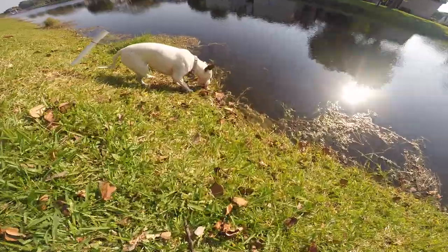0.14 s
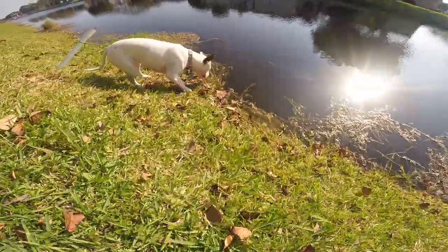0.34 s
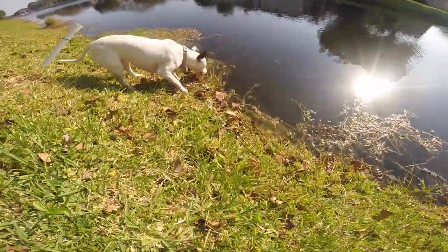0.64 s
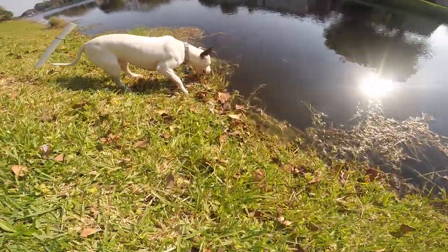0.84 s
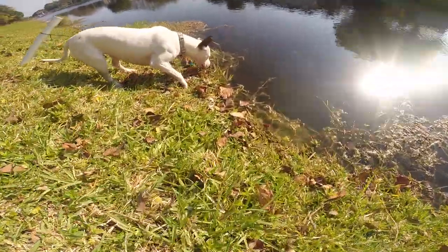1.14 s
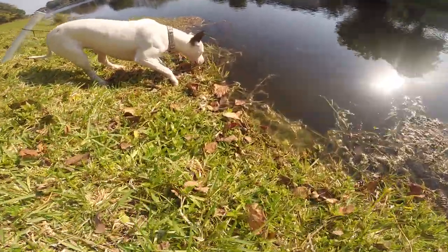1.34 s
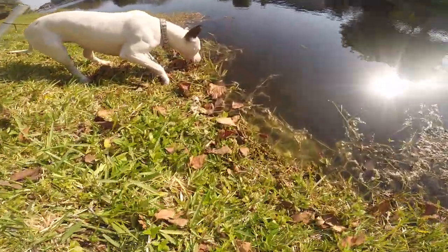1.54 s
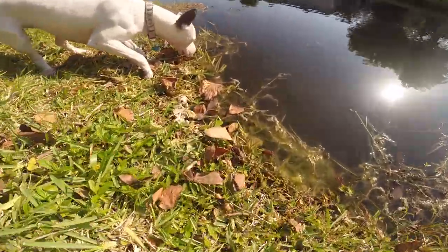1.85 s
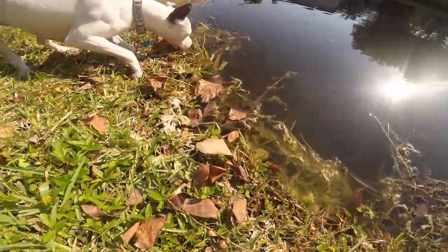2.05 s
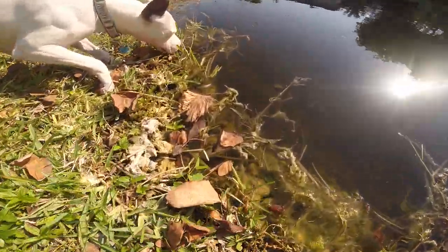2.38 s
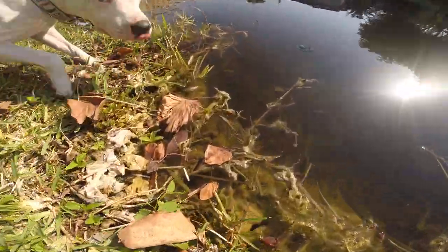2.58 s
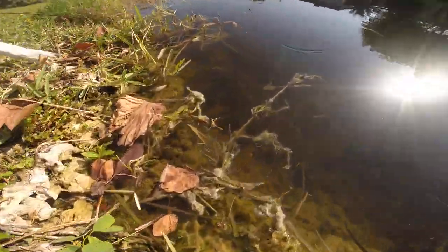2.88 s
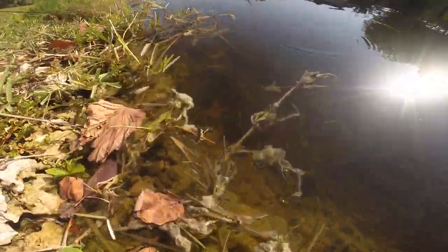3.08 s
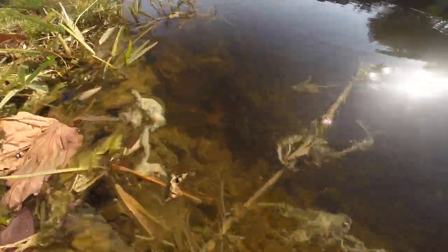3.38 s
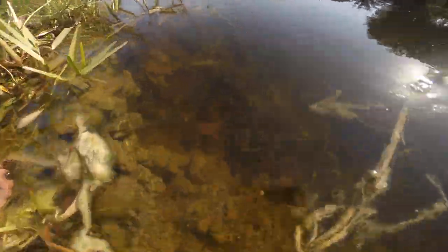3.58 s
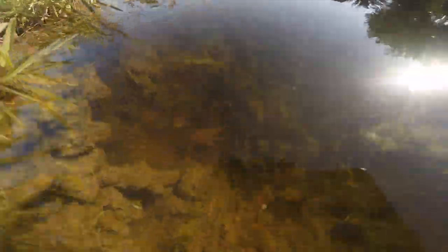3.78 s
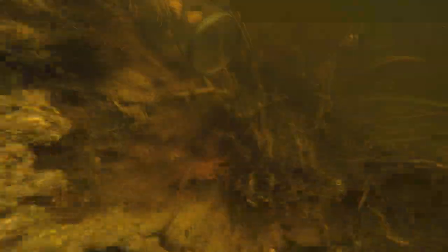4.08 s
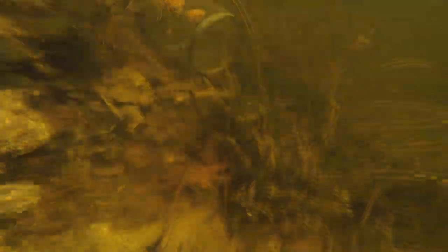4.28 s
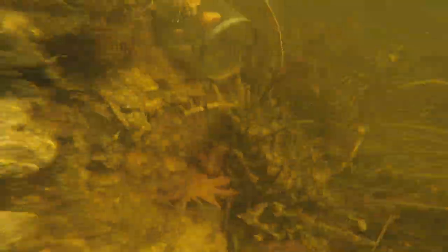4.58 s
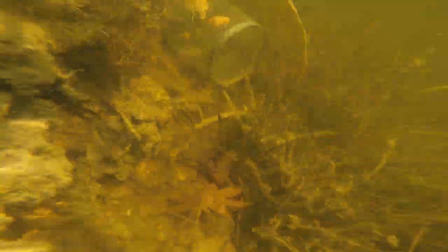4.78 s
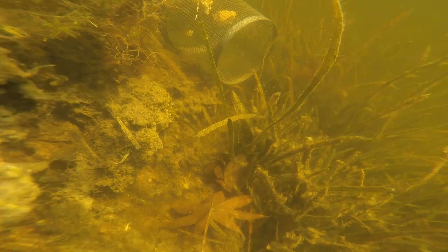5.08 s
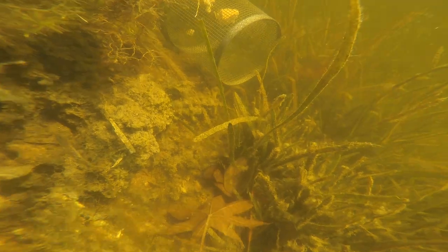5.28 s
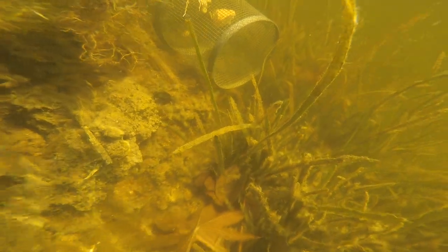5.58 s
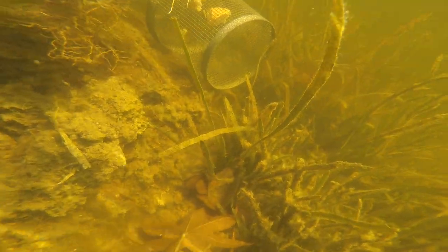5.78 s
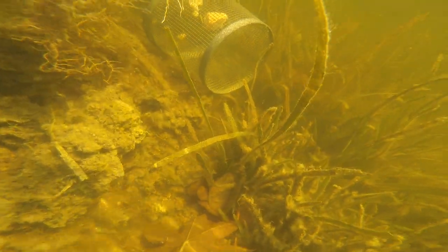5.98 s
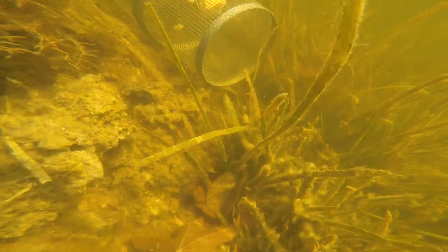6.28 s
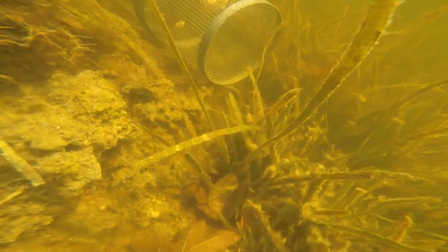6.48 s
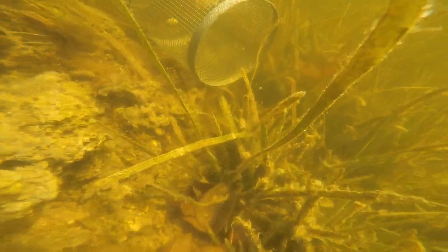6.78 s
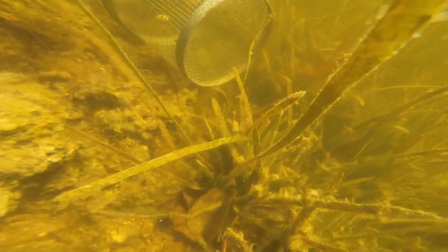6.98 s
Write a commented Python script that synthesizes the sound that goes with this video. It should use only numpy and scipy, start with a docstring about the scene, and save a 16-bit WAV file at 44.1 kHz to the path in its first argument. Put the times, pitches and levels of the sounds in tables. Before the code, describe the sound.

Boomy knocks and plastic rattles of a sealed camera housing over grass, faint collar tag jingles, then a sharp watery plunge and muffled underwater thuds.

```python
"""A camera in a sealed housing is carried over a grassy bank, past a dog, and dipped into a pond.
From the start, jolts boom in the mount and rattle the plastic shell, the grip rubs and low trembling goes on.
Grass crackles along the bank, then the dog's collar tags tinkle as a few fast-dying high tones.
Water snaps, gulps and fizzes as it closes over the shell: short rings, gliding tones and filtered tiny clicks.
Below the surface there are dull thuds and, near the end, a stronger low rumble; hiss and a whine run throughout."""
import sys
import numpy as np
from scipy import signal
from scipy.fft import rfft, irfft
from scipy.io import wavfile
from scipy.ndimage import uniform_filter1d

SR = 44100
rng = np.random.default_rng(int(sys.argv[2]) if len(sys.argv) > 2 else 0)


def put_to_file(sound):
    """Save the sound as 16-bit audio at rate SR, in the file named by the first command-line argument."""
    columns = np.atleast_2d(sound).T  # one column per channel
    safe = np.clip(columns, -1, 1)
    whole_steps = np.round(safe * 32767)
    wavfile.write(sys.argv[1], SR, whole_steps.astype(np.int16))


N = 314874
TIME = np.arange(N) / SR  # s
SUBMERGED_S = 4.0  # sounds that start after this use the shell and mount loaded by water


def amp(db):
    """Turns decibels into a gain."""
    return 10 ** (np.asarray(db) / 20)


def unit_rms(x):
    """Scales a sound to an rms (average strength) of 1."""
    return x / np.sqrt(np.mean(x ** 2) + 1e-20)


def unit_peak(x):
    """Scales a sound to a peak of 1."""
    return x / (abs(x).max() + 1e-20)


def add(mix, start, sound):
    """Mixes a sound in at a start time in seconds, cut off where the mix ends."""
    part = mix[round(start * SR):][:len(sound)]
    part += sound[:len(part)]


def fade(t, t60):
    """Dies away smoothly, 60 dB down after t60 seconds."""
    return np.exp(-np.log(1000) * t / t60)


def swell(start, end, attack, release):
    """Loudness that rises from start over attack, holds until end and falls 60 dB in release (all s)."""
    rise = np.clip((TIME - start) / attack, 0, 1)
    return rise * fade(np.maximum(TIME - end, 0), release)


def flutter(depth_db, size):
    """A random gain that wanders over about size samples."""
    smooth = uniform_filter1d(rng.standard_normal(N), size)
    smooth = uniform_filter1d(smooth, size)
    return amp(depth_db * unit_rms(smooth))


def grains(per_s, spread_db):
    """Random tiny clicks of uneven size, scaled to rms 1."""
    size = amp(spread_db * np.minimum(rng.exponential(1, N), 4))
    happens = rng.random(N) < per_s / SR
    return unit_rms(size * rng.choice([-1, 1], N) * happens)


def colour(x, points):
    """Filters a sound to a tone colour given as (f/Hz, level/dB) points, then scales it to rms 1."""
    hz, db = np.transpose(points)
    f = np.fft.rfftfreq(len(x), 1 / SR)
    gain = amp(np.interp(np.log(f + 1), np.log(hz + 1), db))
    return unit_rms(irfft(rfft(x) * gain, len(x)))


def resonate(x, hz, width):
    """A resonance of about gain 1: shifts its pitch down to zero, smooths, and shifts back up."""
    turn = np.exp(2j * np.pi * hz * np.arange(len(x)) / SR)
    r = np.exp(-np.pi * width / SR)
    smoothed = signal.lfilter([1 - r], [1, -r], x / turn + 1e-18)
    return 2 * (turn * smoothed).real


def muffle(x, hz, order=4):
    """Takes away the sound above a frequency (low-pass)."""
    return signal.sosfilt(signal.butter(order, hz, fs=SR, output="sos"), x)


def jolts():
    """A soft push sets the mount booming, while the shell clacks and chatters briefly in its seat."""
    # jolts of the housing: [t/s, boom peak level/dB, rattle peak level/dB, rattle brightness f/Hz]
    jolt_list = [(.003, -21.5, -44, 1500), (.104, -13.5, -49, 4500), (0.138, -23.5, -54, 3500),
                 (.317, -32.5, -37.5, 2520), (.3605, -19, -29.5, 4800), (.392, -22, -35.5, 2500),
                 (.857, -20.5, -30.5, 2800), (.884, -25, -26.5, 3750), (.904, -20, -24.5, 3970),
                 (1.025, -32.5, -36.5, 2460), (1.167, -25, -48, 1000), (1.226, -25, -31, 4260),
                 (1.416, -16, -29, 2180), (2.698, -26, -48, 1500), (2.74, -16.5, -37, 1590),
                 (2.895, -13.5, -29, 3400), (2.951, -19, -42, 890), (3.056, -8.5, -34, 694),
                 (3.473, -10, -31, 3800), (4.604, -23, -31.5, 1500), (5.664, -24.5, -40, 800),
                 (5.757, -13, -25, 800), (5.802, -13, -56, 905), (5.987, -12.5, -28, 3100),
                 (6.048, -11.5, -21.5, 2520), (6.081, -7, -18, 2480)]
    # the mount's ways of vibrating in air: [f/Hz, relative level/dB, 60 dB decay t/s]
    mount_modes = [(63.35, -3.5, 0.38), (88.77, 5, 0.27), (125.7, 8, 0.032), (169.2, 1, 0.12),
                   (228, -3, 0.12), (319, -11, 0.11), (457.4, -19.5, 0.27), (630, -11, 0.085)]
    # a push lasts longer the more its boom outweighs its rattle
    push_s, push_doubles_db = 0.0003, 10.5
    water_load = .87  # clinging water lowers the mount's pitch by this factor
    t, out = TIME[:SR // 3], np.zeros(N)
    for start, boom_db, rattle_db, top_hz in jolt_list:
        load = 1 if start < SUBMERGED_S else water_load
        mount = np.zeros(len(t))
        for k, (hz, db, t60) in enumerate(mount_modes):
            # neighbouring modes start in opposite directions, so the boom swells and beats
            mount += (-1) ** k * amp(db) * np.sin(2 * np.pi * load * hz * t) * fade(t, t60)
        push = push_s * 2 ** ((boom_db - rattle_db) / push_doubles_db)
        force = t * np.exp(-t / max(push, 1e-4))
        boom = unit_peak(signal.fftconvolve(mount, force)[:len(t)])

        clack = amp(10.5) * (t == 0)  # the first contact drives all resonances alike
        chatter = rng.standard_normal(len(t)) * (fade(t, 0.022) + amp(-23.0) * fade(t, 0.29))
        rattle = unit_peak(shell(clack + chatter, start, top_hz))
        add(out, start, amp(boom_db) * boom + amp(rattle_db) * rattle)
    return out


def shell(x, start, top_hz):
    """Rings the plastic shell, in air or loaded by water; a low top_hz leaves only its low resonances."""
    # the shell's resonances in air: [f/Hz, width of each of two passes f/Hz, level/dB]
    in_air = [(363, 290, 3.5), (571, 75, 4), (644, 85, 0.5), (1187, 570, -2.5), (1493, 125, 1.5),
              (1748, 114, 0.5), (2010, 370, 2), (2565, 310, 0), (2710, 290, -1.5), (3476, 130, -2),
              (4700, 300, -3), (5480, 930, -9.5)]
    # the shell's resonances loaded by water: [f/Hz, width of each of two passes f/Hz, level/dB]
    in_water = [(221, 43, 9.5), (415, 73, 2.5), (634, 104, 6.5), (945, 134, 4.5), (1165, 370, 1.5),
                (1535, 170, 0), (2330, 200, -6), (2730, 250, -10.5), (3500, 490, -14.5), (4640, 210, -7.5),
                (5830, 280, -16.5)]
    ring = np.zeros(len(x))
    for hz, width, db in in_air if start < SUBMERGED_S else in_water:
        ring += amp(db) * resonate(resonate(x, hz, width), hz, width)
    return muffle(ring, top_hz, order=2)


def snaps():
    """Films of water burst at the seams: one sharp ring and a short spray."""
    # water snapping on the shell: [t/s, ring peak level/dB, ring f/Hz, spray level against the ring/dB]
    snap_list = [(4.021, -35.5, 5640, -1), (4.0654, -6.5, 3615, -3), (4.0673, -21, 2410, 3),
                 (4.073, -32.5, 3350, 13), (4.247, -27, 6970, -2), (4.248, -26, 2490, 1),
                 (4.674, -45.5, 4960, 14.5), (4.681, -38.5, 6500, 7), (4.845, -31, 11340, 5.5),
                 (4.899, -50, 12600, 16), (4.937, -35.5, 5730, -2), (5.015, -35, 4570, 4.5),
                 (6.125, -33.5, 2480, -7), (6.133, -48.5, 7200, -10)]
    # tone colour of the spray: [f/Hz, relative level per Hz/dB]
    spray_colour = [(300, 1.5), (1000, -0.5), (2000, 3.5), (4000, 2), (6500, -5.5), (8000, -14),
                    (11000, -18.5), (15000, -23)]
    snap_t60 = 0.0068  # s
    t, out = TIME[:SR // 10], np.zeros(N)
    for start, db, hz, spray_db in snap_list:
        ring = np.sin(2 * np.pi * hz * t) * fade(t, snap_t60) * (1 - np.exp(-t / 0.00013))
        spray = colour(rng.standard_normal(len(t)), spray_colour)
        spray *= fade(t, snap_t60) + amp(-35) * fade(t, 0.017)
        add(out, start, amp(db) * (unit_peak(ring) + amp(spray_db) * unit_peak(spray)))
    return out


def bubbles():
    """Water slaps the shell with a hollow tok and traps air, which rings with a gliding pitch."""
    # bubbles pinching off at the shell:
    # [t/s, ring level before its fades/dB, starting f/Hz, rise/octaves per s, slap level against the ring/dB]
    bubble_list = [(4.021, -34.5, 1740, 8, -16), (4.163, -23, 1766, 4, -14), (4.166, -28, 656, 4, -24),
                   (4.170, -27.5, 1414, 8, -6), (4.174, -32, 2640, 8, 1), (4.211, -38, 1630, 3, -6),
                   (4.318, -34.5, 1500, -2, 7.5), (4.808, -43, 460, 5, -10), (4.893, -33, 1280, 7, 4.5),
                   (4.909, -37, 1670, 41, -20), (4.986, -26.5, 1170, 4, 5), (4.999, -29, 1250, -2, 1),
                   (5.007, -26, 277, 6, 4.5), (5.065, -20.5, 1044, 2, -1.5), (5.176, -21, 1230, 2, -4),
                   (5.7655, -21, 630, 4.5, -15), (6.135, -17, 1010, 8, -2.5), (6.165, -37, 2270, -4, -25)]
    # ring time at this pitch; smaller, higher bubbles die sooner by this power
    ring_s, ring_hz, damping = 0.03, 1200, 0.34
    free_rise = 61  # octaves per s: a bubble racing up this fast has left the shell and rings twice as long
    t, out = TIME[:SR // 10], np.zeros(N)
    tok = unit_peak(resonate(t == 0, hz=640, width=550) * (1 - np.exp(-t / 0.001)))
    for start, db, hz, rise, slap_db in bubble_list:
        t60 = ring_s * (ring_hz / hz) ** damping * (1 + rise / free_rise)
        pitch = hz * 2 ** np.minimum(rise * t, 1)  # climbs one octave at most
        ring = np.sin(2 * np.pi * np.cumsum(pitch) / SR)
        ring *= fade(t, t60) * (1 - np.exp(-t / 0.00023))
        slosh = unit_rms(muffle(rng.standard_normal(len(t)), hz=1500, order=2)) * fade(t, 0.069)
        slap = tok + amp(-18) * slosh
        add(out, start, amp(db) * (ring + amp(slap_db) * slap))
    return out


def wash():
    """Fine fizz along the shell, bright as the water closes over it and dull below the surface."""
    # tone colour of the fizz: [f/Hz, relative level per Hz/dB]
    fizz_colour = [(200, 7), (800, -14), (1300, -5), (1900, -2.5), (2700, -0.5), (4000, -8.5), (6000, -4.5),
                   (8000, -17), (15000, -21)]
    touch_s, plunge_s, plunge_db = 4.016, 4.06, -41  # water climbs the shell, then closes over it
    fizz_db, fizz_t60, fizz_end_s = -51, 6, 5.05  # trapped air fizzes away
    fizz = colour(grains(per_s=2700, spread_db=3.0), fizz_colour)
    climb = fade(np.maximum(plunge_s - TIME, 0), 0.3)  # a fade run backwards
    plunge = climb * swell(touch_s, plunge_s, attack=.005, release=0.11)
    sunk = swell(plunge_s, plunge_s, attack=0.015, release=fizz_t60)
    sunk *= fade(np.maximum(TIME - fizz_end_s, 0), 0.42)
    dull = unit_rms(muffle(fizz, hz=2684, order=5)) + amp(-11) * fizz
    return amp(plunge_db) * plunge * fizz + amp(fizz_db) * sunk * dull


def rubs():
    """The grip sticks and slips in fast tiny jerks that ring the shell."""
    # the grip slipping on the shell: [start t/s, end t/s, rms level before the pressure shape/dB]
    rub_list = [(0.022, .05, -55), (.089, .172, -39), (0.361, .383, -44.5), (0.39, 0.502, -49.5),
                (.897, 0.973, -56), (1.223, 1.269, -51), (1.439, 1.495, -56), (5.666, 5.79, -58),
                (6, 6.291, -42.5), (6.379, 6.75, -51)]
    air_hz, water_hz = 4600, 2700  # brightness of a rub in air and under water
    ease_db = -3.5  # the grip eases off by this much over a stroke
    slips = grains(per_s=4000, spread_db=3.0) * flutter(depth_db=3.0, size=250)
    out = np.zeros(N)
    for start, end, db in rub_list:
        top_hz = air_hz if start < SUBMERGED_S else water_hz
        stroke = slips[int(start * SR):][:int((end - start) * SR)]
        pressure = signal.windows.tukey(len(stroke), .5) * amp(np.linspace(0, ease_db, len(stroke)))
        add(out, start, amp(db) * pressure * unit_rms(shell(stroke, start, top_hz)))
    return out


def tags():
    """Small metal tags clink and skitter on each other; mostly their high ring gets through."""
    # the dog's collar tags jingling: [t/s, ring peak level/dB, 60 dB settling of the bounces t/s]
    hit_list = [(2.651, -46.5, 0.037), (2.697, -33.5, 0.062), (2.822, -48, 0.11), (3.056, -43.5, 0.068),
                (3.1034, -41.5, 0.046), (3.274, -39.5, 0.016), (3.3012, -36.5, .08), (3.32, -43, .07),
                (3.334, -38, 0.032), (3.4507, -48.5, .03), (3.7863, -51.5, .02)]
    # the tags' ringing tones: [f/Hz, relative level/dB, 60 dB decay t/s]
    tag_modes = [(8600, -4, 0.053), (9200, -3, .03), (9920, 3, 0.044), (10050, 6, 0.05), (10060, 0, 0.07),
                 (10500, -17, .04), (11300, -12, 0.036), (14000, -5, .08)]
    # tone colour of the contact noise: [f/Hz, relative level per Hz/dB]
    clink_colour = [(1000, -16), (2500, 3), (5000, 8), (7200, 6.5), (11000, -28), (15000, -14)]
    clink_db = -5.5  # contact noise against the ring
    ticks_per_s, tick_db = 9, -55  # while the dog is near, its tags also touch faintly by chance
    t, out = TIME[:SR // 4], np.zeros(N)
    modes = np.array([amp(db) * np.sin(2 * np.pi * hz * t) * fade(t, t60) for hz, db, t60 in tag_modes])
    tick_times = np.arange(2.9, 3.9, 1 / ticks_per_s)  # s
    tick_times = tick_times + rng.random(len(tick_times)) / ticks_per_s
    ticks = [(start, tick_db, .03) for start in tick_times]
    for start, db, settle in list(hit_list) + ticks:
        skitter = rng.standard_normal(len(t)) * (rng.random(len(t)) < 450 / SR)  # about 450 bounces per s
        bounces = (t == 0) + skitter * fade(t, settle)
        spot = amp(6.3 * rng.standard_normal(len(modes)))  # each contact point favours other modes
        ring = signal.fftconvolve(bounces, spot @ modes)[:len(t)]
        clink = colour(rng.standard_normal(len(t)), clink_colour) * fade(t, 0.054)
        add(out, start, amp(db) * (unit_peak(ring) + amp(clink_db) * unit_peak(clink)))
    return out


def grass():
    """Blades brush and snap in clumps of fine crackle, heard through the shell."""
    # strides brushing through the grass: [start t/s, end t/s, level/dB]
    stride_list = [(0.592, 0.77, -61.5), (0.894, 0.983, -61), (1.477, 1.9, -61.5), (2.765, 2.98, -61)]
    # tone colour of the grass: [f/Hz, relative level per Hz/dB]
    grass_colour = [(800, -38), (1800, -2.5), (2900, 6.5), (4000, -6), (4900, 0), (5900, 3.5), (6600, -4),
                    (7600, -20), (11000, -12), (15000, -53)]
    attack, release = 0.029, 0.41  # s: the blades bend, then spring back
    crackle = grains(per_s=2500, spread_db=4.0) * flutter(depth_db=2.5, size=700)
    strides = sum(amp(db) * swell(start, end, attack, release) for start, end, db in stride_list)
    bank = amp(-70.5) * swell(0.54, 3.6, attack, release)  # faint rustle all the way down the bank
    return np.hypot(strides, bank) * colour(crackle, grass_colour)


def rumble():
    """Constant small pushes keep the mount's low modes stirring."""
    # tone colour of the trembling: [f/Hz, relative level per Hz/dB]
    tremble_colour = [(12, -9), (25, -0.5), (38, -11), (50, 0), (60, 4.5), (72, -7), (87, -0.5),
                      (105, -15.5), (140, -15), (190, -28.5), (220, -29), (300, -38.5), (600, -46),
                      (2000, -82)]
    stir = colour(rng.standard_normal(N), tremble_colour)
    steadied = stir / np.sqrt(uniform_filter1d(stir ** 2, size=6000) + 1e-6)  # evens out the level
    # walking dies down to a steady hand, then the housing rests against the pond bed
    hand, walk = amp(-46.5), amp(-33) * fade(TIME, 4.9)
    bed = amp(-32) * swell(5.62, 5.62, attack=0.11, release=15)
    return (hand + walk + bed) * steadied


def electronics():
    """Microphone hiss, made of filtered noise, and a thin steady whine of pure tones."""
    # tone colour of the hiss: [f/Hz, relative level per Hz/dB]
    hiss_colour = [(120, -29), (200, -0.5), (231, -5), (392, -7.5), (454, -7), (564, -8.5), (1210, -12),
                   (2600, -15.5), (3680, -19.5), (8500, -26), (9310, -29.5), (14700, -34.5), (15500, -37)]
    # whine of the camera's electronics: [f/Hz, rms level/dB]
    whine_tones = [(5850, -80.5), (8781, -79.5), (11718, -81.5), (14625, -88.5)]
    hiss = amp(-59.5) * colour(rng.standard_normal(N), hiss_colour)
    whine = sum(amp(db) * np.sqrt(2) * np.sin(2 * np.pi * hz * TIME) for hz, db in whine_tones)
    return hiss + whine


def scene():
    """Everything reaches one microphone inside the housing, so the sounds simply add up."""
    water = snaps() + bubbles() + wash()
    return (jolts() + water + rubs() + tags() + grass() + rumble() + electronics())[None]


def record(dry):
    """The recorder's band limit: a steep low-pass at 15600 Hz."""
    band_limit = signal.firwin(255, 15600, window=("kaiser", 8), fs=SR)
    return signal.oaconvolve(dry, band_limit[None], "same")


dry = scene()
out = record(dry)
put_to_file(out)
```